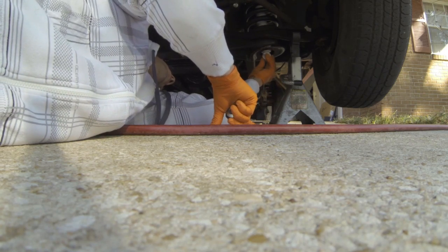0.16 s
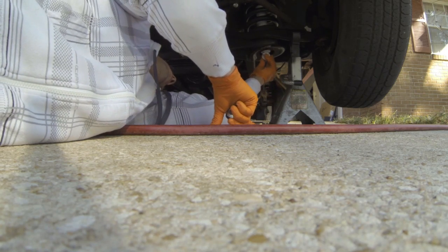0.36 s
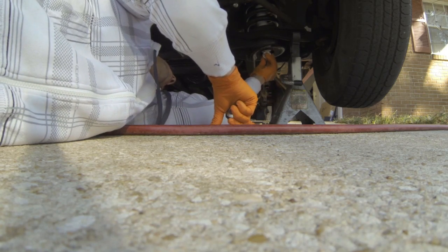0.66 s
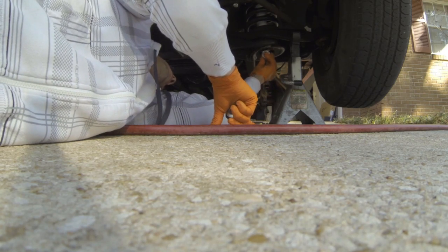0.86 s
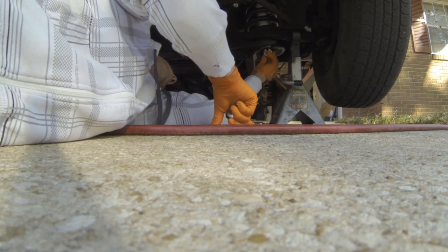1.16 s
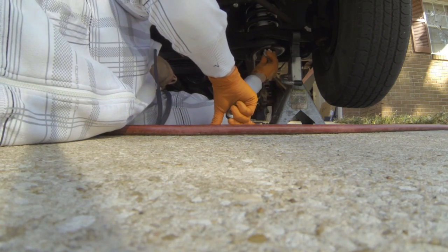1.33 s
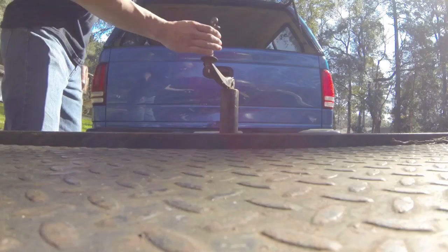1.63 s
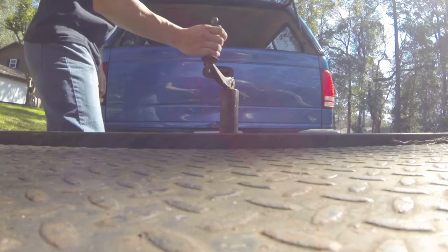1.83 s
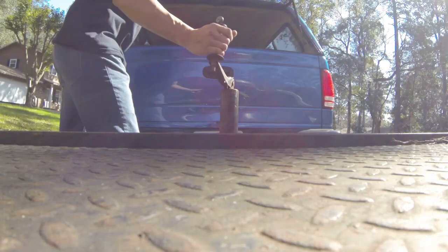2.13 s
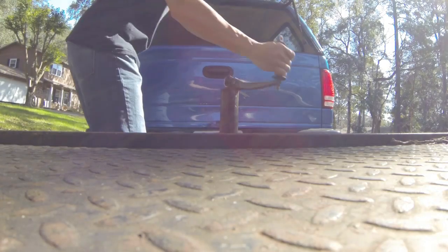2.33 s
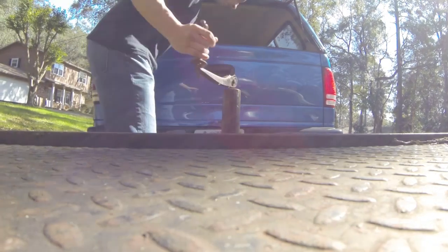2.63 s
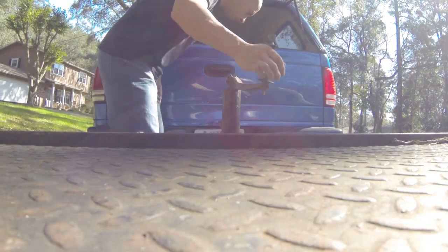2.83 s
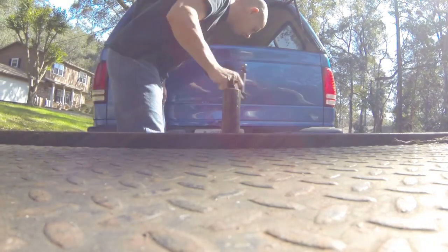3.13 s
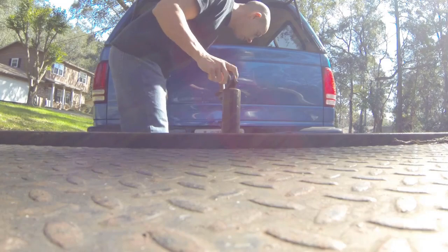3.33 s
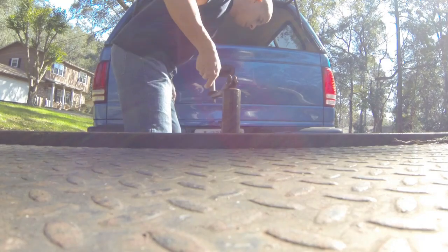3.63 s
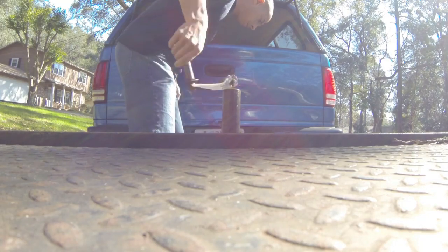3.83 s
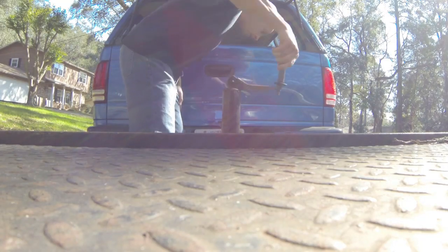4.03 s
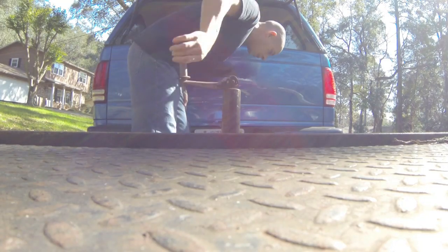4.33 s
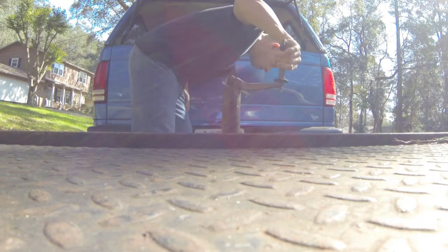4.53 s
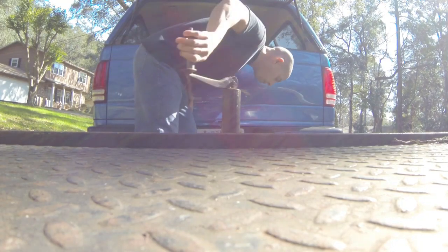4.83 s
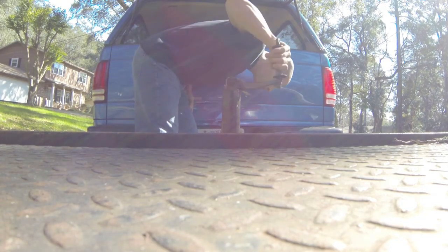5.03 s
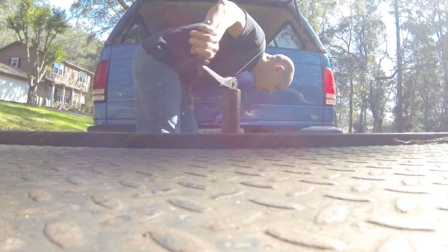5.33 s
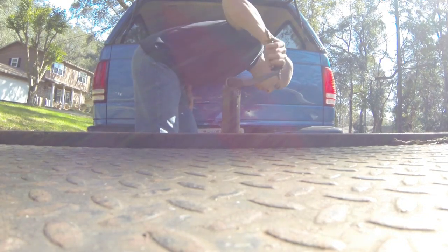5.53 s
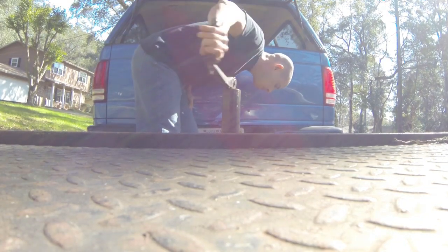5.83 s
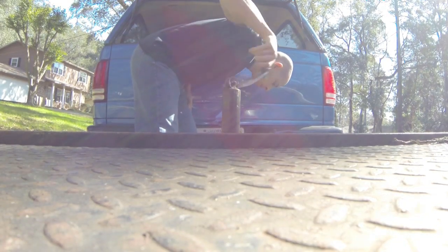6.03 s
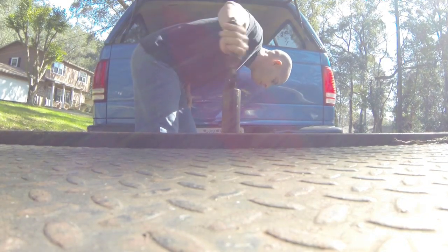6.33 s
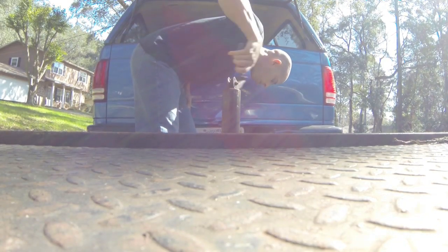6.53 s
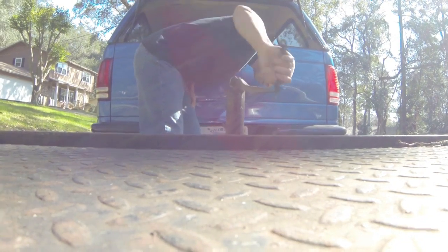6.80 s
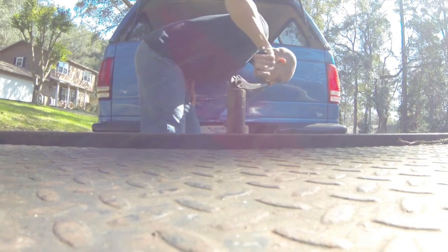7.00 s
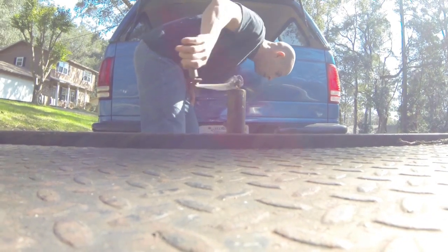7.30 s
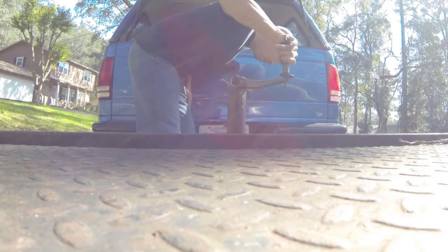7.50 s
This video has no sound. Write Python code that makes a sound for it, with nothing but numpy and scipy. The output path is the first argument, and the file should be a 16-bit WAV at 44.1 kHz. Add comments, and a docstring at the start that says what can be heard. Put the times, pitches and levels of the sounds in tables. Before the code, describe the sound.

After a quiet outdoor moment and one knock, a hand-cranked metal trailer jack clacks, grinds and squeaks unevenly over a low engine hum.

```python
"""A trailer jack being cranked. First a quiet driveway: distant traffic, birds, one knock under the trailer.
At 1.71 s the scene cuts with a click to the steel deck, which an idling engine shakes with a low hum. As the
crank turns, slack parts clack, the screw grinds and makes the frame groan, dry bearings squeak and the loose
handle pings. Near the end a heavy clunk leaves the deck plate shuddering."""
import sys
import numpy as np
from scipy import signal
from scipy.fft import rfft, irfft
from scipy.io import wavfile
from scipy.ndimage import uniform_filter1d

SR = 44100
rng = np.random.default_rng(int(sys.argv[2]) if len(sys.argv) > 2 else 0)


def generate_wav(sig):
    """Save sig (samples, or channels by samples) to the path in sys.argv[1] as 16-bit PCM at SR."""
    pcm = np.round(np.clip(np.atleast_2d(sig).T, -1, 1) * 32767).astype(np.int16)
    wavfile.write(sys.argv[1], SR, pcm)


N = 337806
T = np.arange(N) / SR
UNFOLD_S = 2.3  # the handle lies folded until then

# tone colour of struck or scraped steel: f/Hz, level/dB
STEEL_SPECTRUM = [(300, 1.5), (900, 2.5), (1600, -1), (2400, 0), (3900, 1.5), (5000, -6), (7000, -7),
                  (10000, -20), (13000, -14.5), (16000, -50)]


def undb(db):
    return 10 ** (np.asarray(db) / 20)


def unit(x):
    return x / np.sqrt(np.mean(x ** 2))


def coloured(points):
    """Noise of unit level, shaped by points of f/Hz, level/dB."""
    hz, db = np.transpose(points)
    log_f = np.log(np.maximum(np.arange(N // 2 + 1) * SR / N, 1))
    gain = undb(np.interp(log_f, np.log(hz), db, left=-80, right=-80))
    return unit(irfft(gain * rfft(rng.standard_normal(N)), N))


def walk(rate):
    """Smooth random drift, `rate` steps a second, with a spread near 1."""
    k = max(int(SR / rate), 1)
    steps = np.repeat(rng.standard_normal(N // k + 1), k)
    return 1.27 * uniform_filter1d(uniform_filter1d(steps, k), k)[:N]


def ring(x, hz, t60):
    """One decaying mode, peak 1 for a unit blow."""
    pole = np.exp(2j * np.pi * hz / SR - np.log(1000) / (t60 * SR))
    return signal.lfilter([1], [1, -pole], x).imag


def band(x, hz, width):
    return signal.lfilter(*signal.iirpeak(hz, hz / width, fs=SR), x)


def sine(hz):
    return np.sin(2 * np.pi * np.cumsum(hz) / SR)


def add(out, s, x):
    i = int(s * SR)
    out[i:i + len(x)] += x[:N - i]


def fade(t60, length=.6):
    return undb(-60 * np.arange(int(length * SR)) / SR / t60)


def burst(noise, db, t60):
    """A hit cut from noise: starts at `db` and dies away."""
    envelope = undb(db) * fade(t60)
    return envelope * unit(noise)[:len(envelope)]


def traffic():
    """A gently drifting bed of distant traffic and hiss."""
    # outdoor air: f/Hz, level/dB
    spectrum = [(20, 9.5), (44, 1.5), (68, 0.5), (216, -6.5), (301, -16), (485, -19), (2600, -39.5),
                (13900, -49), (16000, -56.5)]
    return undb(-37 + .7 * walk(7)) * coloured(spectrum)


def birds():
    """Faint, fluttering sine glides: short chirps and one long whistle."""
    # notes by shape: onsets/s, length/s, start f/Hz, end f/Hz, level/dB
    notes = [((.12, .4, .688), .015, 3600, 4780, -56), ((.505, .793), .023, 4170, 3030, -57), ((1.2,),
             .5, 3440, 3400, -67)]
    out = np.zeros(N)
    for starts, length, start_hz, end_hz, db in notes:
        n = int(length * SR)
        note = np.hanning(n) * sine(np.linspace(start_hz, end_hz, n))
        for s in starts:
            add(out, s, undb(db + 2 * walk(62)[:n]) * note)
    return out


def knock_and_tick():
    """A blow rings the metal under the trailer and the body booms just after; a small tick follows."""
    # modes of the struck metal: f/Hz, drive/dB, t60/s
    modes = [(228, -25.5, 0.0028), (553, -60, 0.2), (964, -61.5, 0.29), (1106, -45.5, 0.056),
             (2754, -45.5, 0.021)]
    knock_s, tick_s = .2045, .547
    blow = np.zeros(N)
    add(blow, knock_s, fade(t60=0.14, length=0.097))
    out = sum(undb(db) * ring(blow * rng.standard_normal(N), hz, t60) for hz, db, t60 in modes)
    boom = band(band(rng.standard_normal(N), 218, 76), 270, 630)
    add(out, knock_s + 0.026, burst(boom, db=-29.5, t60=0.72))
    noise = rng.standard_normal(N)
    smack = band(band(noise, 930, 1200), 1200, 4000)
    add(out, knock_s, burst(smack, db=-27.5, t60=0.09))
    add(out, tick_s, burst(band(noise, 6300, 2500), db=-55.5, t60=0.094))
    return out


def clacks():
    """Chattering bursts of steel noise, mostly slack parts clacking; the treble dies first."""
    # bursts: t/s, level/dB, nominal decay/s, treble boost/dB
    # 1.71 s is a short click as the scene cuts to the deck; 6.47 s is a bright rasp on top of a squeak
    bursts = [(1.71, -31, 0.022, 10), (1.7255, -17, 0.14, 4.5), (1.748, -16, 0.21, -1.5),
              (1.8704, -27.5, 0.45, -1), (1.915, -23.5, 0.21, -12), (2.34, -40.5, 0.26, -12),
              (2.4936, -23, 0.91, -2), (2.564, -25.5, 0.21, 12), (2.7443, -93.5, 0.24, 63),
              (2.7633, -40.5, 0.29, 15), (2.845, -37, 0.49, 8), (2.8592, -25, 0.49, -24),
              (3.0257, -35, 0.45, 10), (3.165, -37.5, 0.22, 5.5), (3.248, -22, 0.45, 1),
              (3.417, -46, 0.096, 5), (3.4836, -56, 0.23, 16.5), (3.5786, -49, 0.9, 3),
              (3.703, -48, 0.27, 0), (3.913, -28.5, 0.75, 4.5), (3.9825, -28, 0.31, 1),
              (4.0695, -32.5, 0.13, -27), (4.1625, -42, 0.48, 7), (4.2008, -39, 0.13, 14.5),
              (4.289, -27.5, 0.54, -9), (4.31, -26.5, 0.68, 5), (4.582, -30.5, 0.73, -15),
              (4.6571, -26, 0.23, 4.5), (4.742, -26, 0.19, 6), (4.791, -25.5, 0.72, -7),
              (4.9229, -23.5, 0.3, 2.5), (5.0058, -28, 0.19, -2), (5.109, -41.5, 0.56, 13),
              (5.1404, -25.5, 0.24, -3), (5.198, -27, 0.37, -6), (5.238, -31.5, 0.85, 4.5),
              (5.316, -29.5, 0.45, 7), (5.3644, -31, 0.27, -2), (5.4, -27.5, 0.079, -15),
              (5.512, -39.5, 0.31, 10), (5.5843, -35.5, 0.23, -7), (5.7187, -25.5, 0.24, 9),
              (5.7948, -30.5, 0.3, -17), (5.831, -32.5, 0.2, 9.5), (6.004, -37.5, 0.75, -6),
              (6.1336, -41.5, 0.65, -16), (6.1867, -24, 0.18, 9), (6.2792, -43.5, 0.23, 6),
              (6.4722, -37.5, 0.38, 8), (6.555, -34, 0.23, -2), (6.642, -24.5, 0.21, 8),
              (6.6752, -29, 0.22, 3), (6.767, -25, 0.32, 8.5), (6.915, -37, 0.71, -16),
              (6.9617, -26, 0.42, 5.5), (7.141, -61.5, 0.085, -10), (7.194, -34, 0.17, 3),
              (7.216, -37, 0.11, 12), (7.3428, -28, 0.41, 5)]
    # resonances of the jack: f/Hz, width/Hz, level/dB
    jack_modes = [(2350, 16, 2.5), (2585, 20, -5.5), (3415, 26, 2), (4150, 61, -8), (4260, 130, -20.5),
                  (4950, 49, -5), (5840, 37, -3.5), (6730, 51, -1.5), (10040, 64, 7.5)]
    out, size = np.zeros(N), 16384
    f, t = np.arange(size // 2 + 1) * SR / size, np.arange(size) / SR
    steel_hz, steel_db = np.transpose(STEEL_SPECTRUM)
    steel = undb(np.interp(np.log(f + 1), np.log(steel_hz), steel_db, left=-40))
    treble = 1 / (1 + (5500 / (f + 1)) ** 4)
    attack = 1 - np.exp(-t / 0.001)
    chatter = undb(1.5 * walk(200) + 2.56 * walk(60))
    for s, db, decay, treble_db in bursts:
        decay = np.clip(decay, .01, .6)
        mix_db = rng.uniform(-12, 4, len(jack_modes))
        detune = rng.uniform(.988, 1.012, len(jack_modes))  # the modes move with grip and height
        if s < UNFOLD_S:  # with the handle folded, one mode rings out
            mix_db[6], detune[6] = 12, 1
        modes = sum(undb(mode_db + mix) / (1 + ((f - hz * shift) / width) ** 4)
                    for (hz, width, mode_db), mix, shift in zip(jack_modes, mix_db, detune))
        # each burst favours its own broad bands
        spot_hz = np.r_[rng.uniform(2200, 5200, 2), rng.uniform(5500, 12000, 2)]
        spots = sum(1 / (1 + ((f - hz) / 300) ** 4) for hz in spot_hz)
        colour = steel * (0.32 + modes + 0.68 * spots)
        ringing = modes * steel / colour  # the share that sits in a mode and outlasts the noise
        spectrum = rfft(rng.standard_normal(size)) * colour / np.sqrt(np.mean(colour[:size // 4] ** 2))
        body = sum(irfft(spectrum * (1 - treble) * part) * undb(-60 * (t / (stretch * decay)) ** 1.066)
                   for part, stretch in ((ringing, 1.05), (1 - ringing, 0.9)))
        top = irfft(spectrum * treble) * undb(treble_db - 60 * t / (0.5 * decay))
        rattle = np.resize(chatter[int(s * SR):], size) ** np.minimum(t / 0.066, 1)
        add(out, s, undb(db) * attack * (body + top) * rattle)
    return out


def engine_and_rumble():
    """The idling engine's wavering hum over a flickering rumble and the deck's own lowest sway."""
    # shaking of the deck: t/s, engine level/dB, rumble level/dB
    shake = [(1.712, -15.5, -29), (2.28, -17.5, -36.5), (2.29, -32, -35.5), (2.45, -30, -30),
             (2.65, -36, -34.5), (3.2, -45.5, -43), (3.8, -34, -48), (4.3, -37.5, -37), (5.0, -37, -43),
             (5.45, -29.5, -36.5), (6.0, -30, -40), (6.72, -31, -41.5), (6.8, -36, -31), (7.05, -36, -35),
             (7.66, -41.5, -40.5)]
    # engine partials: f/Hz, relative level/dB
    partials = [(43, -3.5), (60, -5), (86, -8.5), (140, -17), (205, -21.5)]
    # deck rumble: f/Hz, level/dB
    rumble_spectrum = [(50, -40), (80, 5.5), (140, -2), (250, -6), (400, -16.5), (800, -46.5)]
    times, *levels = np.transpose(shake)
    engine_db, rumble_db = (np.interp(T, times, db) for db in levels)
    hum = sum(undb(db + hz / 60 * walk(22.01)) * sine(hz * (1 + 0.0195 * walk(8))) for hz, db in partials)
    sway = undb(-37 + 3.8 * walk(3.53)) * unit(band(band(rng.standard_normal(N), 31.3, 34), 30.8, 10))
    rumble = undb(rumble_db + 2 * walk(12)) * coloured(rumble_spectrum)
    return undb(engine_db) * unit(hum) + rumble + sway


def crank_load_db():
    """Load on the screw: each push swells fast and ebbs slowly over a resting level."""
    # pushes on the crank: peak t/s, level/dB
    pushes = [(1.75, -37), (2.049, -45.5), (2.451, -40.5), (3.0, -56), (4.001, -40.5), (4.4, -42.5),
              (4.85, -39.5), (5.3, -38), (5.85, -38), (6.3, -47), (6.81, -28.5)]
    swell_db_per_s, ebb_db_per_s, rest_db = 68, 30, -57
    power = undb(rest_db) ** 2
    for s, db in pushes:
        drop_db = np.where(T < s, swell_db_per_s * (s - T), ebb_db_per_s * (T - s))
        power += undb(db - drop_db) ** 2
    dip_db = -19 * ((T > 2.285) & (T < 2.341))  # the grinding dips briefly
    return 10 * np.log10(power) + dip_db


def screw():
    """Uneven slips of the screw make the frame groan; the thread hisses in gritty grains."""
    # resonances of the frame: f/Hz, width/Hz, level/dB
    frame_modes = [(462.6, 13.7, -12), (698, 660, -2)]
    slips = rng.standard_normal(N) * undb(2.1 * walk(200) + 2 * walk(25))
    groan = sum(undb(db) * unit(band(band(slips, hz, width), hz, 2 * width))
                for hz, width, db in frame_modes)
    grains = undb(-19 + 3.9 * walk(160) + walk(36))
    hiss = band(coloured(STEEL_SPECTRUM), 2100, 2500) + 1.2 * band(coloured(STEEL_SPECTRUM), 3200, 700)
    return undb(crank_load_db()) * (groan + grains * hiss)


def squeaks():
    """Dry bearings stick and slip at a pitch; unsteady slips smear it over a band and make it rasp."""
    # rubs, from squeaks down to groans: t/s, length/s, f/Hz, level/dB, width/Hz
    rubs = [(1.747, 0.032, 3750, -34, 450), (2.489, 0.084, 2310, -30.5, 100),
            (2.512, 0.052, 2600, -29, 200), (2.858, 0.1, 3660, -31.5, 513), (2.93, 0.082, 3856, -36.5, 398),
            (3.019, 0.021, 2275, -29, 197), (3.037, 0.071, 3537, -23, 67.5),
            (3.238, 0.071, 2198, -31.5, 207), (3.622, 0.04, 2163, -35.5, 90.8),
            (3.772, 0.066, 3400, -37, 510), (3.907, 0.075, 2270, -24.5, 84), (4.151, 0.061, 2570, -41, 147),
            (4.299, 0.12, 2294, -29.5, 106), (4.343, 0.083, 820, -35, 144), (4.58, 0.086, 2160, -39.5, 152),
            (4.593, 0.16, 700, -37.5, 208), (4.645, 0.036, 2243, -28, 201),
            (4.707, 0.054, 2200, -33.5, 100), (4.755, .15, 1136, -35, 157), (4.77, .16, 546.5, -41, 150),
            (4.777, 0.075, 2400, -35.5, 81), (4.915, 0.032, 2264, -33.5, 200),
            (5.193, 0.027, 2240, -36, 150), (5.199, 0.16, 813, -37, 207), (5.731, 0.14, 1144, -38.5, 80.5),
            (5.767, 0.11, 591, -32.5, 74.6), (6.009, 0.052, 2126, -38, 39.6),
            (6.186, 0.15, 908, -42.5, 322), (6.182, 0.023, 3820, -39, 400), (6.452, 0.086, 2104, -28, 40),
            (6.764, 0.027, 1117, -25.5, 504), (7.338, 0.054, 3910, -25.5, 257)]
    # harmonics of a rub, fundamental first: level/dB
    harmonics = [6, -1, -5.5, -11, -17]
    out, wobble = np.zeros(N), walk(35)
    rasp = undb(3.2 * walk(140) + 1.97 * walk(600))
    for s, length, hz, db, width in rubs:
        t = np.arange(int((length + .1) * SR)) / SR
        release = np.maximum(t - length, 0)
        envelope = np.minimum(t / (0.28 * length), 1) * undb(-6 * t / length - 240 * release)
        bend = 1 + .008 * wobble[int(s * SR):][:len(t)] - .1 * release  # wavers with the grip, then sags
        slips = rng.standard_normal(16384) + 1j * rng.standard_normal(16384)
        smear = signal.lfilter(*signal.butter(3, width / SR), slips)[-len(t):]
        smear = smear / np.std(smear) + 22 / width  # narrow squeaks keep a steady core
        phase = 2 * np.pi * hz * np.cumsum(bend) / SR + np.angle(smear)
        wander = 0.64 * 0.097 * np.cumsum(rng.standard_normal(len(t)))  # the overtones drift in phase
        rolloff_db = width / 90 + 8.7 * (hz / 3500) ** 4  # broad and high rasps lose their overtones
        tone = sum(undb(level - k * rolloff_db) * envelope ** (k / 2) * np.sin((k + 1) * phase + k * wander)
                   for k, level in enumerate(harmonics))
        add(out, s, undb(db) * envelope * unit(np.abs(smear)) ** 0.39 * tone)
    return out * rasp


def handle_pings(clatter):
    """The loose handle rings at two high modes: strongly after a jog and, unfolded, faintly with clacks."""
    # jogs of the handle: t/s, lower mode drive/dB, upper mode drive/dB
    jogs = [(1.7504, -89, -51), (2.5046, -52, -74), (2.856, -51, -52), (3.2594, -75, -55),
            (4.796, -59, -63), (4.837, -60.5, -60), (5.144, -87, -64), (5.24, -61, -57.5),
            (5.84, -65.5, -69), (6.282, -71.5, -90), (6.679, -72, -58.5), (6.795, -87, -61),
            (6.965, -59.5, -64), (7.217, -83, -63)]
    mode_hz, ring_t60_s = (8090, 12180), (0.06, 0.035)
    rattle_t60_s, clack_feed_db = (0.24, 0.13), (-46, -48)
    rattles = np.zeros((2, N))
    for s, *drives_db in jogs:
        for rattle, db, t60 in zip(rattles, drives_db, rattle_t60_s):
            add(rattle, s, undb(db) * fade(t60, length=.4))
    out, jolts = np.zeros(N), np.abs(clatter) * (T > UNFOLD_S)
    for hz, t60, db, rattle in zip(mode_hz, ring_t60_s, clack_feed_db, rattles):
        drive = (rattle + undb(db) * jolts) * undb(0.9 * walk(43))
        out += ring(drive * rng.standard_normal(N), hz, t60)
    return out


def deck_shudder():
    """After the heavy clunk, uneven shaking swells and ebbs in the low modes of the deck plate."""
    # plate modes: f/Hz, level/dB
    modes = [(136, 1), (207, -5.5), (275, -5), (418, -8.5)]
    start_s, peak_s, ebb_db_per_s = 6.768, 6.88, 28.5
    swell_db = np.interp(T, [start_s, peak_s], [-36, -30]) - ebb_db_per_s * np.maximum(T - peak_s, 0)
    plate = sum(undb(db) * unit(band(band(rng.standard_normal(N), hz, 23), hz, 103)) for hz, db in modes)
    return undb(swell_db) * (T > start_s) * plate


def scene():
    """The driveway, then a quick cut to the deck as the cranking starts; mono."""
    cut_s, crossfade_s = 1.71, 0.0085
    on_deck = np.clip((T - cut_s) / crossfade_s, 0, 1)
    clatter = clacks()
    deck = engine_and_rumble() + screw() + deck_shudder()
    jack = clatter + handle_pings(clatter) + squeaks()
    driveway = traffic() + birds() + knock_and_tick()
    return ((1 - on_deck) * driveway + on_deck * deck + jack)[None]


def record(dry):
    """A steep low-pass takes off the very top."""
    cutoff_hz = 15900
    return signal.sosfilt(signal.ellip(8, .2, 70, cutoff_hz, fs=SR, output="sos"), dry)


dry = scene()
out = record(dry)
generate_wav(out)
```